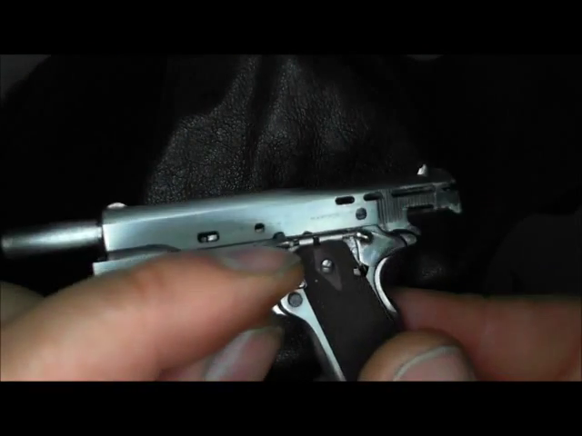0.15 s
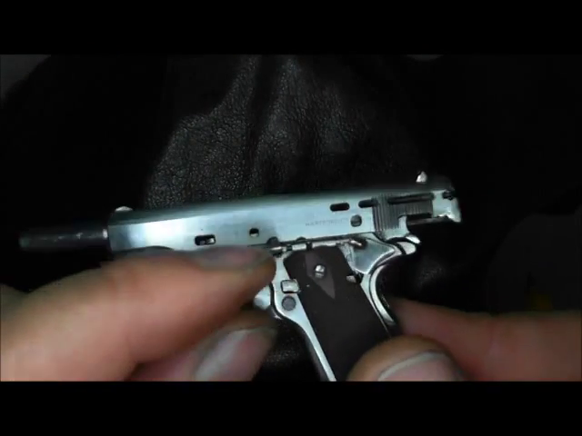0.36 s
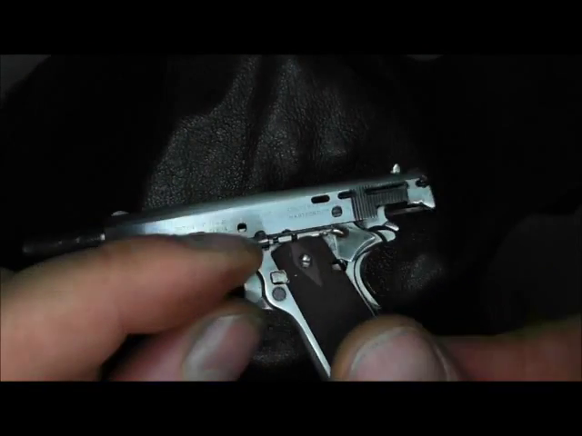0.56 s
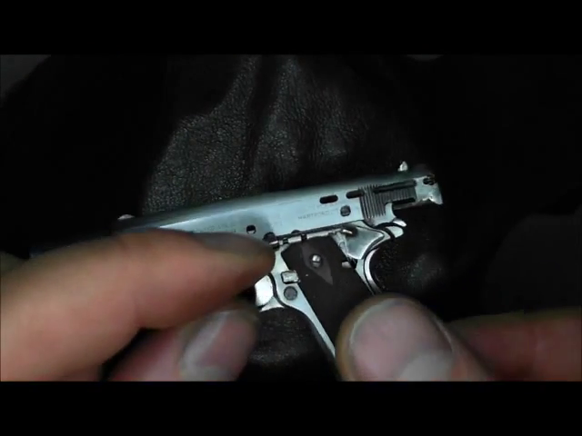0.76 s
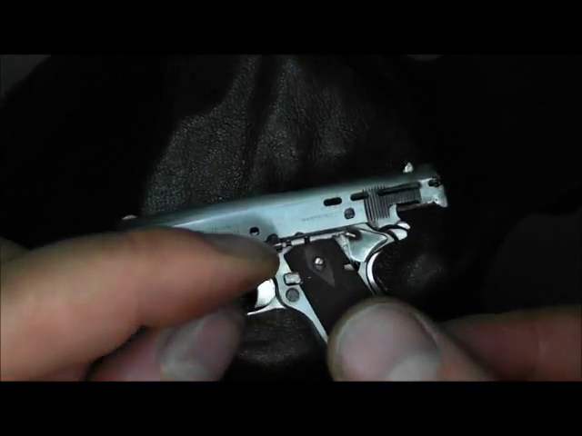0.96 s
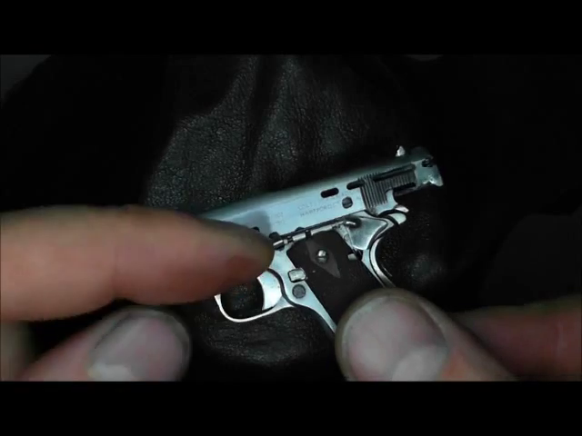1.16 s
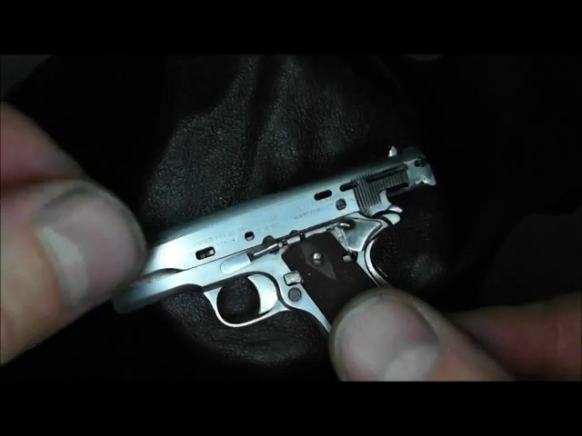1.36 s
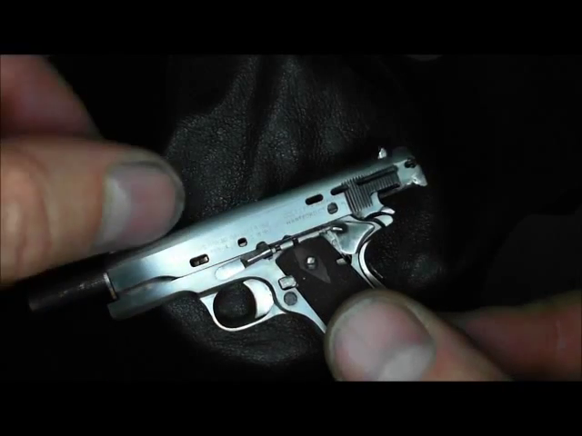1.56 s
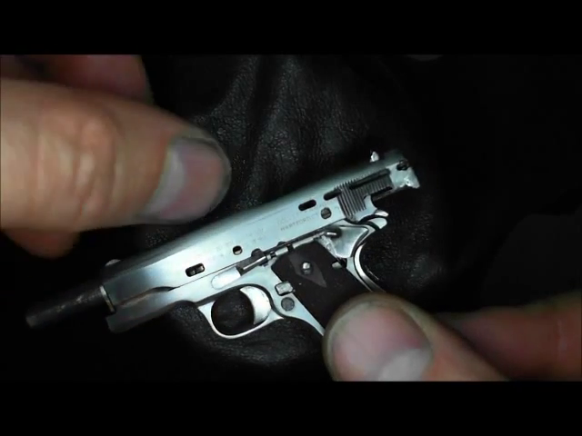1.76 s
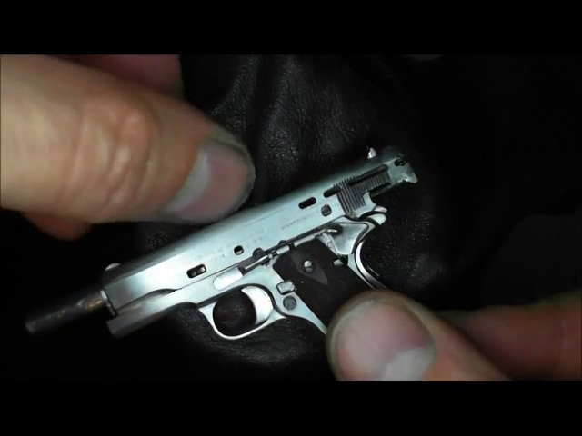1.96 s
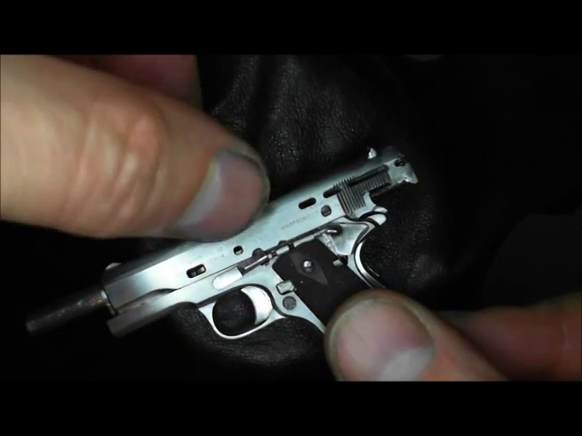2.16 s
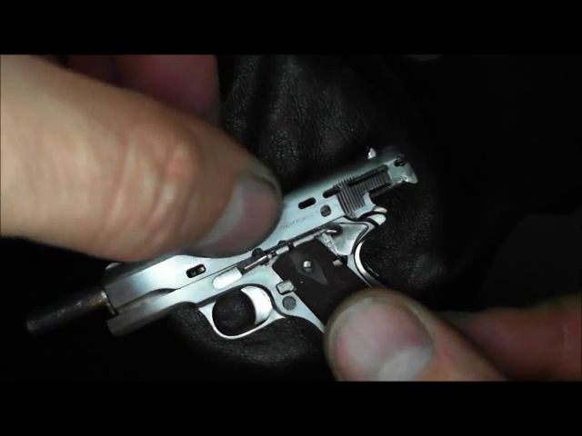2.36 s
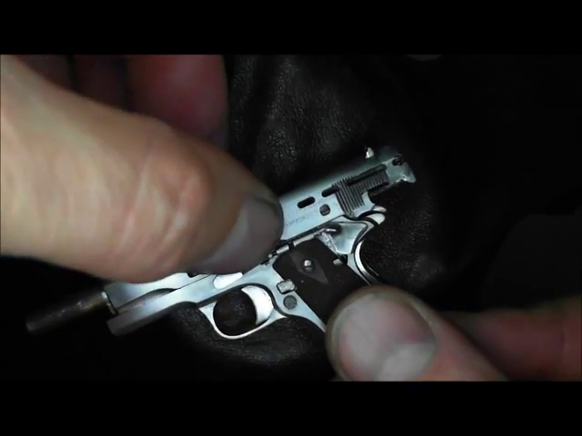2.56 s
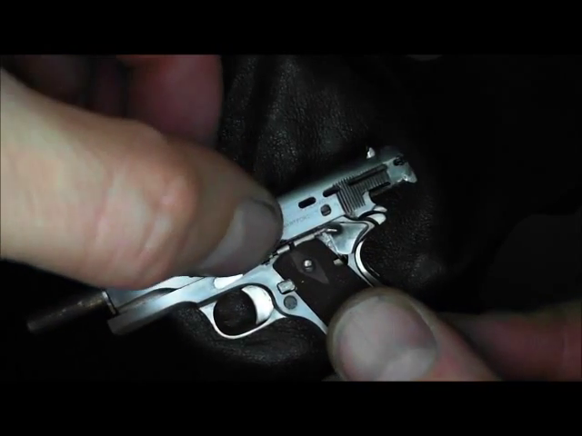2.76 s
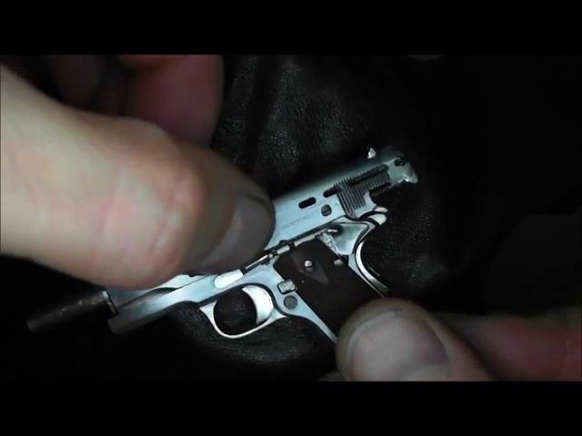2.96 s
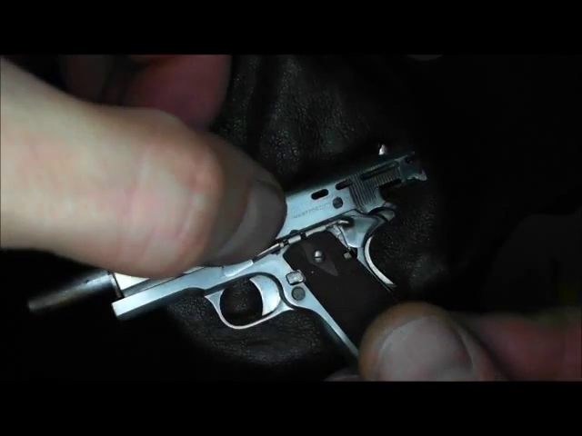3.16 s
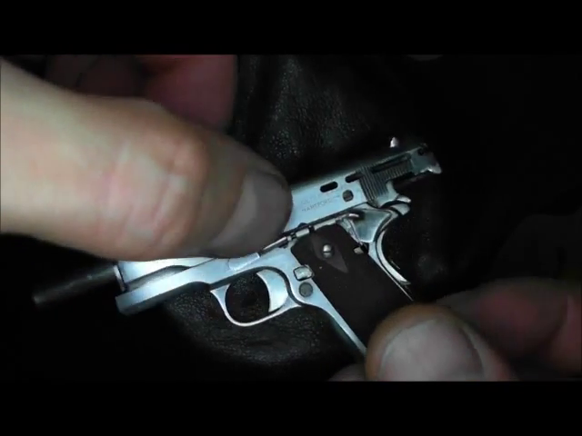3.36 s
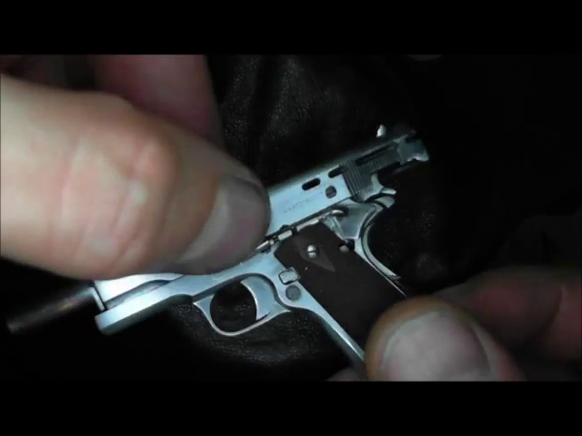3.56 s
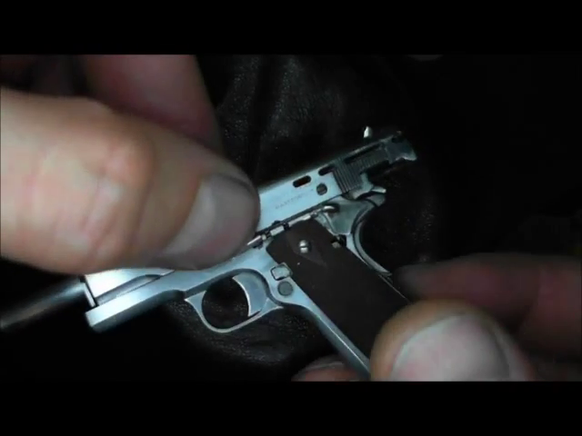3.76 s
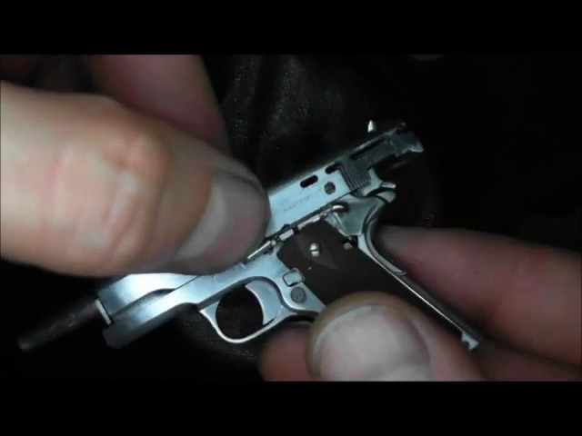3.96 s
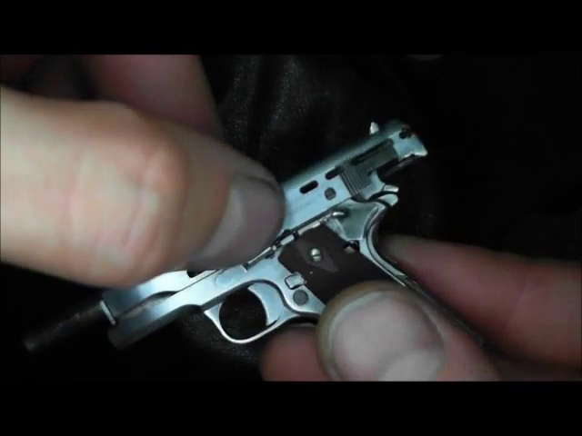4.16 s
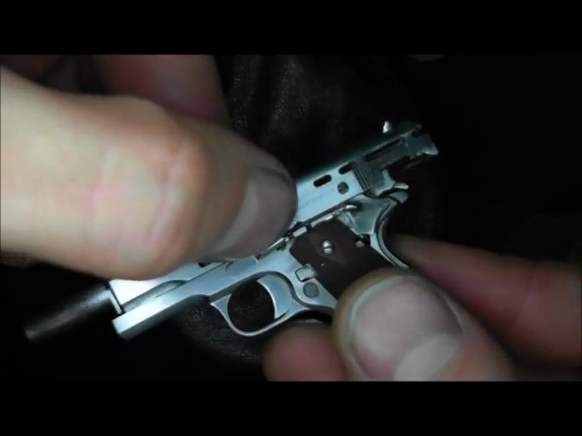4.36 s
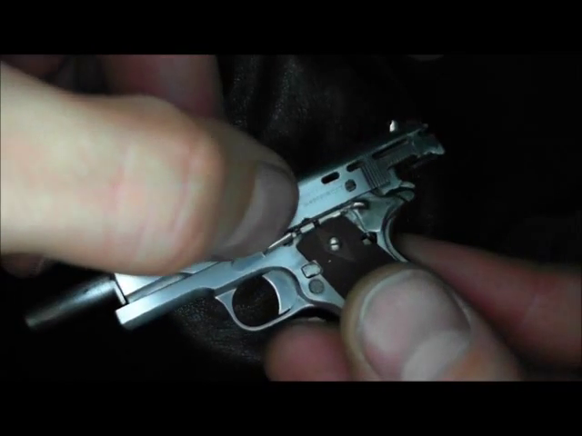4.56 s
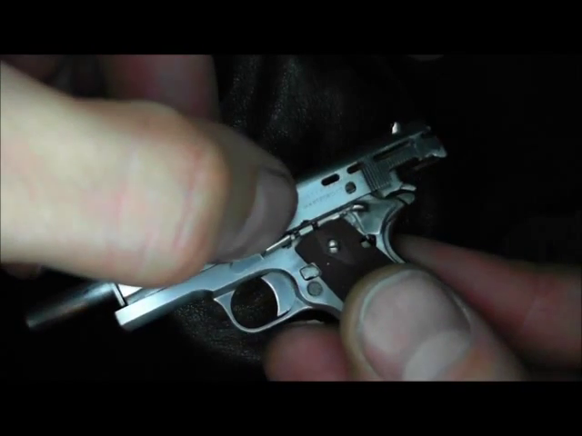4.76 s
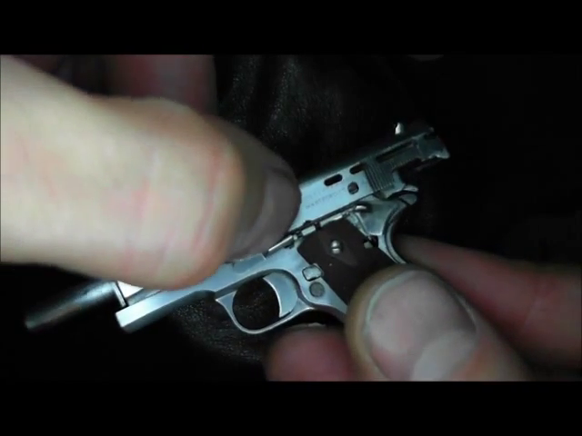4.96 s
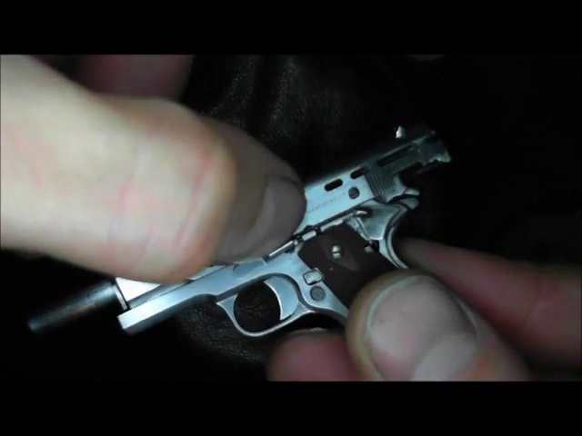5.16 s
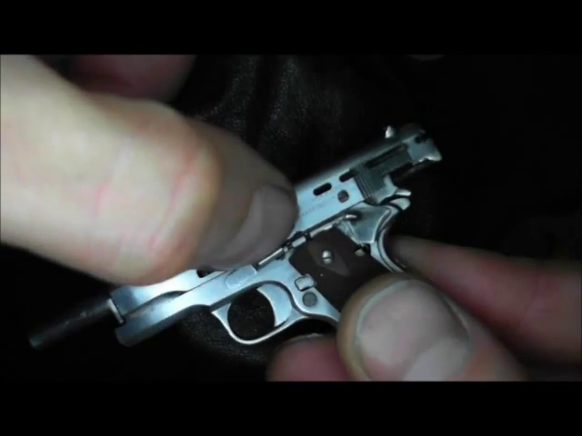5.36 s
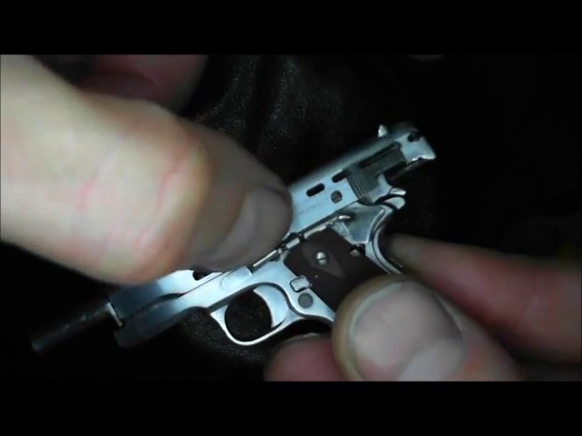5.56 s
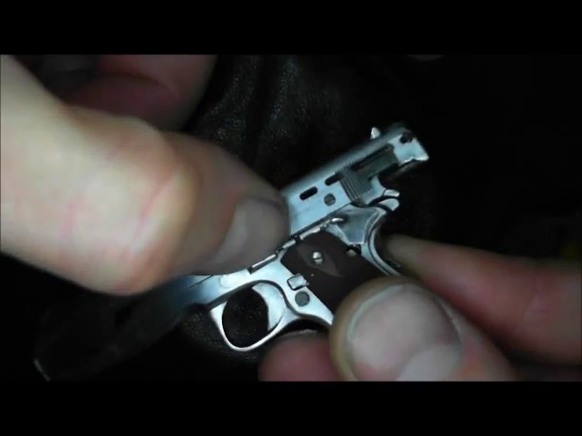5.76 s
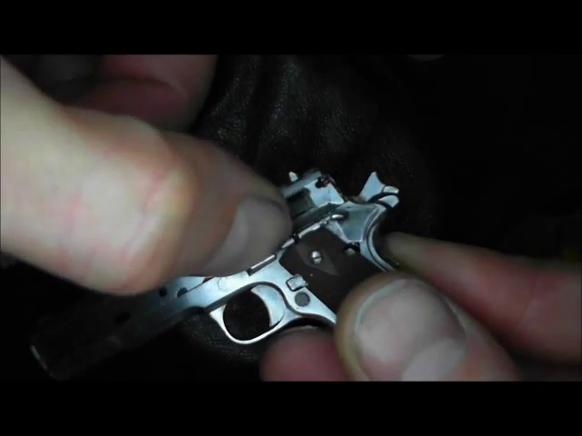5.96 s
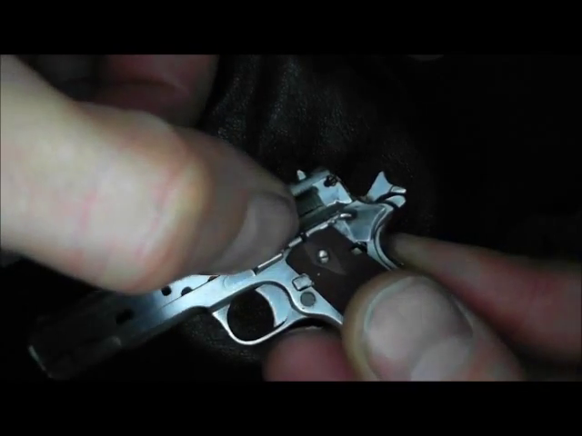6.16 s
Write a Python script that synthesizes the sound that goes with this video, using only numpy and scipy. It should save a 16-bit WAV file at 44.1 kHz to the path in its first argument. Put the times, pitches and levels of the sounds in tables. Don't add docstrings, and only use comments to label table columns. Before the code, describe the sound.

Very close to the microphone in a quiet indoor room, fingers hiss and rustle over a tiny steel mechanism. Mains hum, a thin high whine and muffled traffic booms lie beneath. Sparse small ticks come, busiest midway, then a calmer stretch as a far engine draws nearer. At the end the catch snaps and the slide slams with a bright, clipping crack, a deep thump and a brief rattle.

```python
import sys
import numpy as np
from scipy import signal
from scipy.fft import rfft, irfft
from scipy.io import wavfile
from scipy.ndimage import uniform_filter1d

SR = 44100
rng = np.random.default_rng(int(sys.argv[2]) if len(sys.argv) > 2 else 0)


def int16_out(signal):
    q = np.round(np.clip(np.atleast_2d(signal).T, -1, 1) * 32767)
    wavfile.write(sys.argv[1], SR, q.astype(np.int16))


def gain_from_decibels(decibels):
    exponent = np.asarray(decibels, float) / 20
    return 10 ** exponent


N = 273420
STEP = 32

# frequency in Hz, level in dB per Hz.
ROOM_NOISE = [(12, -37), (20, 1.5), (70, -3.5), (274, -9.5), (352, -19.5), (428, -16.5), (520, -18),
              (746, -19.5), (811, -20), (882, -18.5), (4080, -35), (11700, -40.5), (13100, -40.5),
              (15500, -40.5)]
ROOM_NOISE_DB = -41
HUM_HZ = [
    59.9,
    428.7,
    808.2,
]
HUM_DB = [-42, -52, -56.5]
WHINE_HZ, WHINE_DB = 12706.6, -64.5
GAPS_PER_S, FIRST_GAP_S, GAP_S, GAP_LEFT = 14.985, .031, .012, .25

# multiple of the strongest order, level in dB.
ENGINE_ORDERS = [(.5, -24), (1, 0.5), (1.5, -14), (2, -14.5)]
# time in seconds, strongest order in Hz, level in dB.
APPROACH = [(4.5, 128, -60), (4.62, 134, -42), (5.1, 131, -53), (5.31, 136, -43), (5.64, 137, -36.5),
            (5.86, 141, -32.5), (5.935, 141, -40.5), (5.965, 138, -35.5), (6.2, 142, -34.5)]
ROAR_DB, ROAR_FOLLOWS = -52.5, .5
# start in seconds, length in seconds, level in dB, strongest order in Hz.
PASSING_ENGINES = [
    (-.05, .23, -43, 165),
    (3.38, 0.34, -45, 133),
]
# start in seconds, length in seconds, level in dB.
TRAFFIC_BOOMS = [(0, 0.37, -52), (0.348, .8, -42), (1.8, 0.88, -42.5), (2.75, 0.32, -43), (3.347, 1, -43),
                 (4.252, .2, -44.5), (4.5, 0.42, -45), (5.28, .16, -44), (5.48, 0.29, -40),
                 (5.88, .35, -39)]
BOOM_FLOOR_DB = -51
SWELL_RISE, SWELL_FALL = 0.15, 0.3

# frequency in Hz, level in dB.
HISS_COLOUR = [(700, -34), (2200, 1), (3600, 1), (4600, 1), (5600, -1.5), (8500, -1), (11000, -20)]
# frequency in Hz, level in dB.
SHEEN_COLOUR = [(6500, -38), (9500, 0.5), (12000, 2.5), (15500, 0)]
# start in seconds, length in seconds, hiss level in dB,
# sheen in dB against the hiss, rustle in dB against the hiss.
DRAGS = [(.55, 0.18, -67, 1, -20), (1.077, 0.82, -55.5, 2, -8), (1.86, .2, -64, -5, -7),
         (2.64, 0.42, -60.5, -2, -8), (3.374, 0.21, -57, -0.5, 5), (3.708, 0.22, -59, 0, 2.5),
         (5.12, .5, -66, 1.5, -10)]
# peak time in seconds, hiss level in dB, fade t60 in seconds,
# sheen in dB against the hiss, rustle in dB against the hiss.
BRUSHES = [(.002, -70.5, 0.38, 0, 27.5), (.428, -68, .4, 0, -10), (.506, -54.5, 0.25, 1, 2),
           (1.438, -56.5, 0.57, 1, 4), (1.79, -58.5, 0.43, -7, 2), (2.135, -51.5, 0.29, 0, 1),
           (2.284, -54.5, 0.28, -2, -8), (2.42, -57, 0.33, -3, 0), (2.515, -57, 0.23, 0, -1),
           (2.678, -62, 0.072, 0, -10), (2.952, -64, .3, -3, -10), (3.515, -47, .12, -10, 2),
           (3.598, -45, 0.2, -4, -0.5), (3.65, -58.5, 0.18, -6, 0), (3.975, -51.5, 0.4, -4.5, 3),
           (5.014, -58, .08, 0, -10), (5.14, -54.5, .2, -2, -10)]
BRUSH_RISE = 0.49

# time in seconds, peak in dB, knock in Hz, knock in dB against the tick,
# thinness from 0 to 1.
TICKS = [
    (1.8579, -24, 3050, -9, 0.33),
    (3.288, -19, 1820, -1, 0.07),
    (3.5972, -32, 2640, -3, 0.4),
]
# time in seconds, peak in dB, thinness from 0 to 1, sharpness from 0 to 1.
TOUCHES = [(0.5048, -41, .8, 0.5), (2.6758, -39, .8, 0.5), (3.1385, -30, .8, 0.25),
           (3.3985, -32.5, 0.2, 0.4), (3.409, -38, .2, .5), (3.5074, -32, 0.1, 0.5), (3.523, -25, 0.8, 0.6),
           (3.611, -31, 0, .7), (4.0624, -42, .8, 0.5), (5.1424, -42, .8, 0.5), (5.8425, -33, .95, 0.6)]
# time in seconds, peak in dB, frequency in Hz, t60 in seconds.
SOFT_KNOCKS = [
    (2.217, -38, 1300, .03),
    (2.485, -37.5, 1260, .03),
    (3.138, -34, 1070, .02),
    (3.399, -28, 1060, 0.0094),
    (3.6082, -18, 654, 0.0042),
]
SCATTER_T60 = 0.029
# frequency in Hz, t60 in seconds.
ECHO_T60 = [(300, 0.45), (1500, 0.58), (4000, 0.34), (7700, 0.31), (11000, 0.15), (16000, .18)]
ECHO_DB = -16

# frequency in Hz, t60 in seconds, level in dB.
FRAME_MODES = [(3570, .012, 0), (2900, .008, -5), (4100, .008, -6)]
# frequency in Hz, t60 in seconds, level in dB.
SLIDE_MODES = [(7750, .026, 0), (7930, .02, -7), (8250, .008, -11), (6950, .008, -11)]
# frequency in Hz, t60 in seconds, level in dB.
PIN_MODES = [(14800, .011, 0), (12400, .008, -4), (13700, .007, -7), (10400, .006, -9)]
# frequency in Hz, level in dB.
CRACK_COLOUR = [(300, -41), (1400, -17), (2500, -1), (4000, 2), (5300, -7), (7000, 6), (9000, 1.5),
                (12500, 2.5), (16000, -2.5)]
# time in seconds, crack in dB, frame in dB, pins in dB,
# chatter t60 in seconds.
RELEASE = [
    (5.8700, -18, -52, -30, 0.22),
    (5.872, -5, -4.5, -15, 0.0063),
    (5.8746, -5, -14, -14, 0.02),
    (5.8780, -15, -32, -23, 0.056),
    (5.8812, -13, -13, -16, 0.049),
]
FREE_SLIDE_DB = -17
# time in seconds, crack in dB, frame in dB, slide in dB, pins in dB.
SLAM = [
    (5.8848, 2.5, -15, -7, 4),
    (5.8873, 0.5, -8.5, 5, -18),
    (5.8920, -3.5, -18, -16, 5.5),
    (5.8950, -8.5, -24, -5, -11),
    (5.8992, -9, -30, -16.5, -20),
]
SLAM_T60 = 0.029
# time in seconds, level in dB, frequency in Hz, t60 in seconds.
JOLT = [
    (5.871, -16, 45.3, .04),
    (5.886, -4.5, 38, 0.039),
    (5.888, -10.5, 624, 0.014),
    (5.886, -19, 1000, 0.0075),
    (5.888, -17.5, 420, .015),
    (5.887, -12, 1800, .008),
    (5.890, -20, 260, 0.023),
]
# frequency in Hz, level in dB.
RATTLE_COLOUR = [(500, -24), (1200, -4), (2500, 0), (6000, -0.5), (10000, -4), (15500, -9)]
RATTLE_S, RATTLE_DB, RATTLE_T60 = 5.893, -20, .31


def evened(x):
    return x / np.sqrt(np.mean(x ** 2) + 1e-20)


def read(points, hz):
    f, value = np.transpose(points)
    return np.interp(np.log(hz + 1), np.log(f + 1), value)


def add(mix, s, sound):
    part = mix[round(s * SR):][:len(sound)]
    part += sound[:len(part)]


def coloured(x, points):
    gain = gain_from_decibels(read(points, np.fft.rfftfreq(len(x), 1 / SR)))
    return evened(irfft(rfft(x) * gain, len(x)))


def noise(points):
    return coloured(rng.standard_normal(N), points)


def drift(hz):
    return noise([(0, 0), (hz, 0), (2 * hz, -80), (SR, -200)])


def ring(t, hz, t60):
    return np.sin(2 * np.pi * hz * t) * gain_from_decibels(-60 * t / t60)


def swell(start, length, db):
    u = (np.arange(0, N, STEP) / SR - start) / length
    return gain_from_decibels(db) * (np.clip(u / SWELL_RISE, 0, 1) * np.clip((1 - u) / SWELL_FALL, 0, 1))


def brush(peak, db, t60):
    t = np.arange(0, N, STEP) / SR - peak
    return gain_from_decibels(db - 60 * np.where(t < 0, -t / BRUSH_RISE, t) / t60)


def filled(gain):
    return np.interp(np.arange(N), np.arange(0, N, STEP), gain)


def background():
    t = np.arange(N) / SR
    out = gain_from_decibels(ROOM_NOISE_DB + 0.205 * drift(hz=2.2)) * noise(ROOM_NOISE)
    for hz, db in zip(HUM_HZ, HUM_DB):
        level = np.sqrt(2) * gain_from_decibels(db + 0.88 * drift(hz=2.64))
        out += level * np.sin(2 * np.pi * hz * t + 0.23 * drift(hz=1.5))
    off_gap = (((t - FIRST_GAP_S) * GAPS_PER_S + .5) % 1 - .5) / GAPS_PER_S
    gate = np.clip((abs(off_gap) - GAP_S / 2) / .001 + 1, GAP_LEFT, 1)
    return out + np.sqrt(2) * gain_from_decibels(WHINE_DB) * gate * np.sin(2 * np.pi * WHINE_HZ * t)


def drone():
    t = np.arange(N) / SR
    s, hz, db = np.transpose(APPROACH)
    near_db = np.interp(t, s, db, -150)
    speed = np.interp(t, s, hz)
    for start, length, _, passing_hz in PASSING_ENGINES:
        speed = np.where((t > start) & (t < start + length), passing_hz, speed)
    turns = np.cumsum(speed) / SR
    wobble = .3 * drift(hz=5)
    orders = np.zeros(N)
    for k, order_db in ENGINE_ORDERS:
        flutter = gain_from_decibels(order_db + 0.97 * k ** 2 * drift(hz=10))
        orders += flutter * np.sin(2 * np.pi * k * turns + k * wobble)
    engine_gain = gain_from_decibels(near_db) + filled(sum(swell(*row[:3]) for row in PASSING_ENGINES))

    boom = noise([(85, -28), (108, 0), (135, 9.0), (165, -43.0)])
    boom_gain = gain_from_decibels(BOOM_FLOOR_DB) + filled(sum(swell(*row) for row in TRAFFIC_BOOMS))
    roar = noise([(150, -32), (300, -1), (900, -3), (2000, -11), (4000, -34)])
    roar_gain = gain_from_decibels(ROAR_DB + ROAR_FOLLOWS * (near_db + 39.5))
    return np.sqrt(2) * engine_gain * orders + gain_from_decibels(-5) * boom * boom_gain + roar * roar_gain


def patchy(x, depth_db):
    z = signal.stft(x, nperseg=256)[2]
    patches = uniform_filter1d(uniform_filter1d(rng.standard_normal(z.shape), 6, 0), 30, 1)
    shifted = signal.istft(z * gain_from_decibels(depth_db * evened(patches)), nperseg=256)[1]
    return evened(shifted[:N])


def fingers():
    slip_size = np.minimum(rng.exponential(1, (2, N)), 4)
    slips = rng.standard_normal((2, N)) * gain_from_decibels(2.0 * slip_size)
    steel = patchy(slips[0], depth_db=1.7)
    strokes = [(swell(*row[:3]), row[3:]) for row in DRAGS]
    strokes += [(brush(*row[:3]), row[3:]) for row in BRUSHES]
    hiss_gain = filled(sum(gain for gain, _ in strokes))
    sheen_gain = filled(sum(gain * gain_from_decibels(sheen_db) for gain, (sheen_db, _) in strokes))
    rustle_gain = filled(sum(gain * gain_from_decibels(rustle_db) for gain, (_, rustle_db) in strokes))

    hiss = coloured(steel, HISS_COLOUR) * hiss_gain
    sheen = coloured(steel, SHEEN_COLOUR) * sheen_gain
    rustle = coloured(slips[1], [(250, -3), (600, -2), (1100, 3.5), (2000, 1.5), (4000, -8.5), (7000, -29.0)])
    rustle = rustle * rustle_gain
    return (hiss + sheen) * gain_from_decibels(1.0 * drift(hz=60)) + rustle * gain_from_decibels(1.4 * drift(hz=40))


def tick(t, t60, thin, sharp):
    z = signal.lfilter([1, .85, .3], [1], rng.standard_normal((2, len(t))))
    contact = evened(signal.lfilter([1, -np.clip(thin, 0, 1)], [1], z[0])) * gain_from_decibels(-60 * t / 0.0048)
    bounce = np.roll(np.diff(contact, prepend=0), round(.0027 * SR))
    late_gain = np.clip((t - .0012) / 0.001, 0, 1) * gain_from_decibels(-60 * (t - .0024) / t60)
    scatter = evened(signal.lfilter([1, -np.clip(0.27 + 0.77 * thin, 0, 1)], [1], z[1]))
    return sharp * (contact + 0.62 * bounce) + 0.26 * late_gain * scatter


def ticks():
    out, t = np.zeros(N), np.arange(4000) / SR
    for s, db, hz, knock_db, thin in TICKS:
        knock = gain_from_decibels(knock_db) * ring(t, hz, .006)
        add(out, s, gain_from_decibels(db) * (tick(t, SCATTER_T60, thin, sharp=.9) + knock))
    for s, db, thin, sharp in TOUCHES:
        add(out, s, gain_from_decibels(db) * tick(t, SCATTER_T60, thin, sharp))
    for s, db, hz, t60 in SOFT_KNOCKS:
        onset = np.clip(t / (0.021 * t60), 0, 1)
        add(out, s, gain_from_decibels(db) * ring(t, hz, t60) * onset)
    return out


def room(x):
    taps = np.zeros(SR // 2)
    at = np.arange(200, len(taps) - 20, 20)
    taps[at + rng.integers(0, 20, len(at))] = rng.choice([-1., 1.], len(at))
    hz, t, z = signal.stft(taps, SR, nperseg=256)
    tail = signal.istft(z * gain_from_decibels(-60 * t / read(ECHO_T60, hz)[:, None]), SR, nperseg=256)[1]
    return signal.fftconvolve(x, tail / np.linalg.norm(tail))[:N]


def struck_part(t, modes):
    return sum(gain_from_decibels(db) * ring(t, hz, t60) for hz, t60, db in modes) * np.clip(t / .0004, 0, 1)


def blows():
    out, t = np.zeros(N), np.arange(4000) / SR
    parts = [struck_part(t, modes) for modes in (FRAME_MODES, SLIDE_MODES, PIN_MODES)]
    run = [(s, db, frame, db + FREE_SLIDE_DB, pins, t60) for s, db, frame, pins, t60 in RELEASE]
    stops = [(*row, SLAM_T60) for row in SLAM]
    for s, crack_db, *part_db, t60 in run + stops:
        dying = gain_from_decibels(-60 * t / t60)
        chatter = rng.standard_normal(len(t)) * dying
        body = sum(gain_from_decibels(db) * part for db, part in zip(part_db, parts))
        rung = body + 0.061 * signal.fftconvolve(chatter, body)[:len(t)]
        crack = coloured(rng.standard_normal(len(t)), CRACK_COLOUR)
        crack *= .45 * gain_from_decibels(-60 * t / 0.0027) + 0.62 * dying
        crack *= np.clip(t / (0.0071 * t60), 0, 1)
        add(out, s, rung + gain_from_decibels(crack_db) * crack)
    return out


def hand_jolt():
    out, t = np.zeros(N), np.arange(8000) / SR
    for s, db, hz, t60 in JOLT:
        add(out, s, gain_from_decibels(db) * ring(t, hz, t60))
    return out


def rattle():
    out, t = np.zeros(N), np.arange(SR // 2) / SR
    shiver = coloured(rng.standard_normal(len(t)), RATTLE_COLOUR)
    add(out, RATTLE_S, gain_from_decibels(RATTLE_DB - 60 * t / RATTLE_T60) * shiver)
    return out


def scene():
    small, slam, jolt = ticks(), blows(), hand_jolt()
    echo = gain_from_decibels(ECHO_DB) * room(slam + jolt + gain_from_decibels(-0.5) * small)
    return (background() + drone() + fingers() + small + slam + jolt + echo + rattle())[None]


def top_cut(x):
    return signal.sosfilt(signal.butter(12, 15660, fs=SR, output="sos"), x)


def record(dry):
    power_db = 10 * np.log10(abs(uniform_filter1d(dry[0] ** 2, 300, origin=149)) + 1e-12)
    fall = np.arange(N) * 60. / SR
    held_db = np.maximum.accumulate(power_db + fall) - fall
    over_db = np.maximum(held_db + 6.0, 0)
    lagged = signal.lfilter([.002], [1, -.998], over_db)
    hot = np.clip(dry / gain_from_decibels(0.72 * lagged), -.95, .95)
    band_limit = signal.firwin(255, 16050, window=("kaiser", 9), fs=SR)
    mix = signal.oaconvolve(hot, band_limit[None], "same")
    return top_cut(mix)


dry = scene()
out = record(dry)
int16_out(out)
```